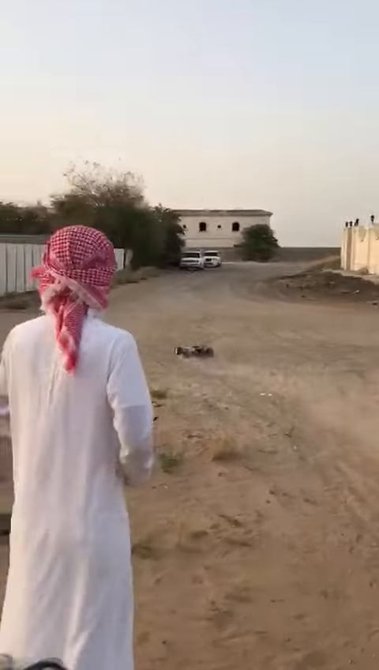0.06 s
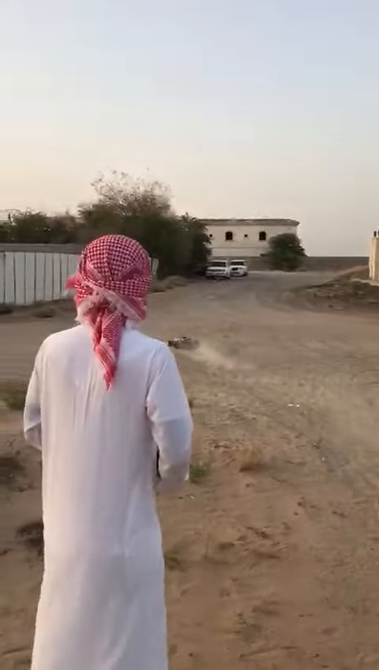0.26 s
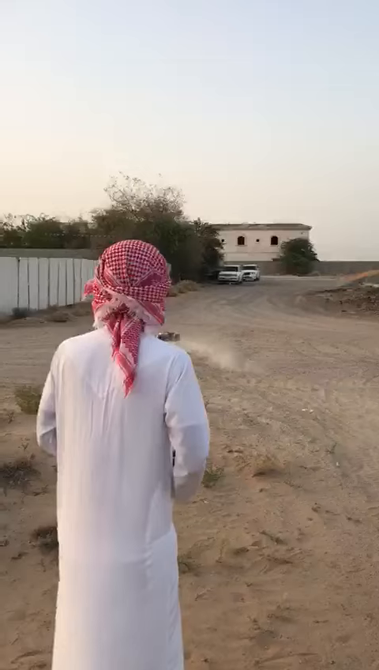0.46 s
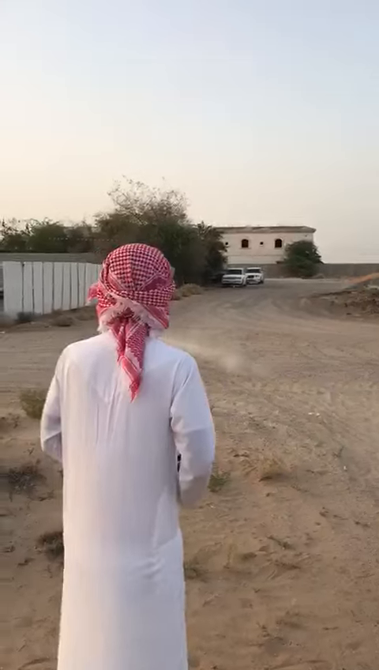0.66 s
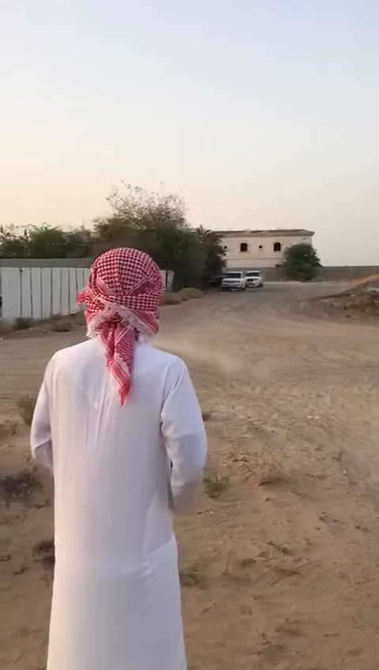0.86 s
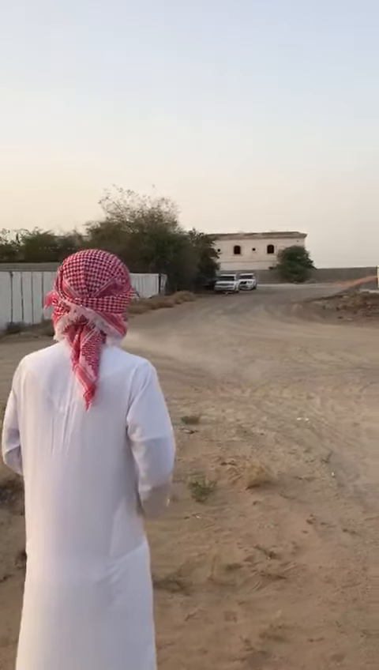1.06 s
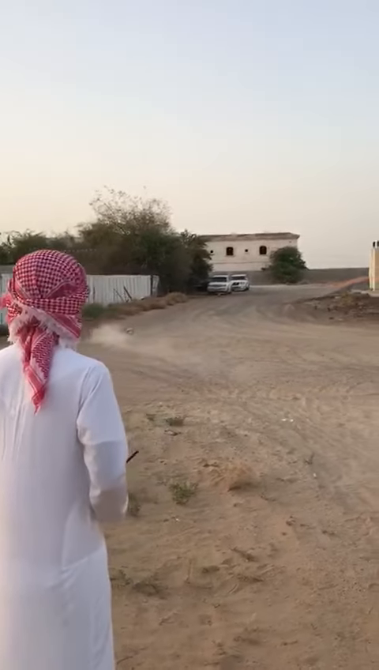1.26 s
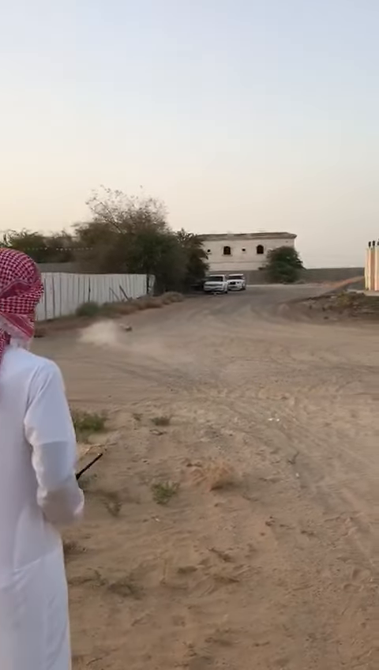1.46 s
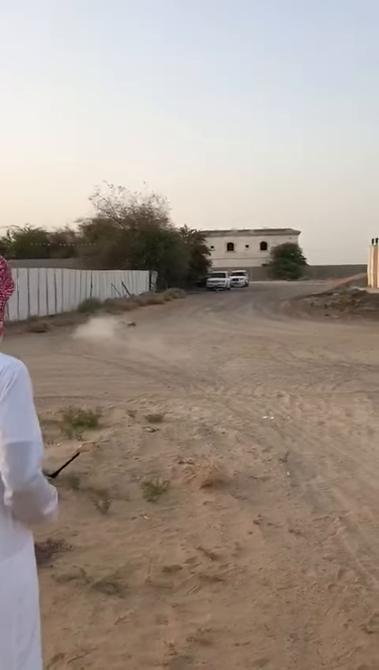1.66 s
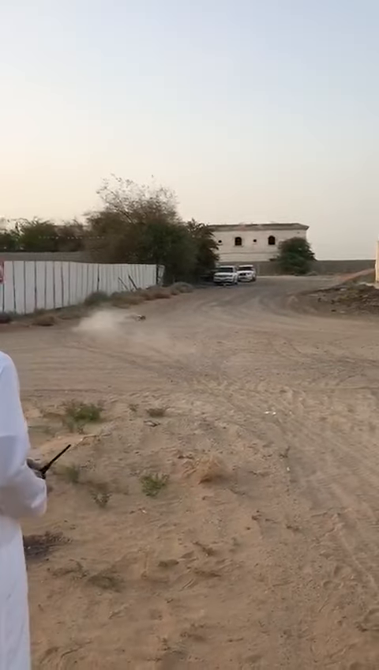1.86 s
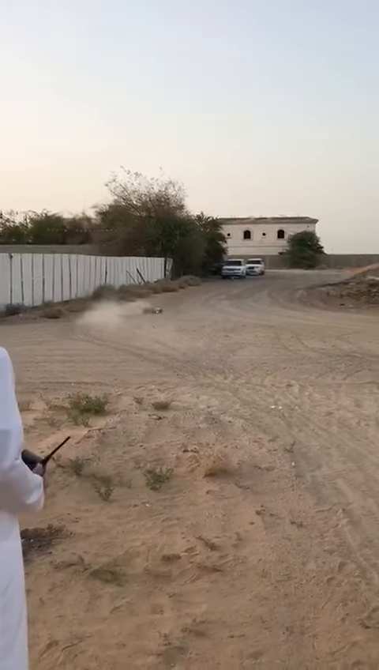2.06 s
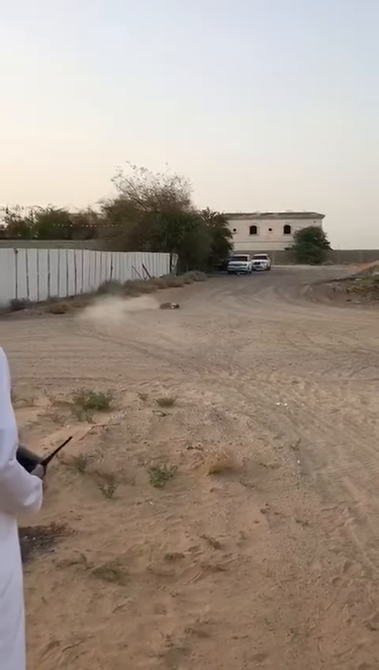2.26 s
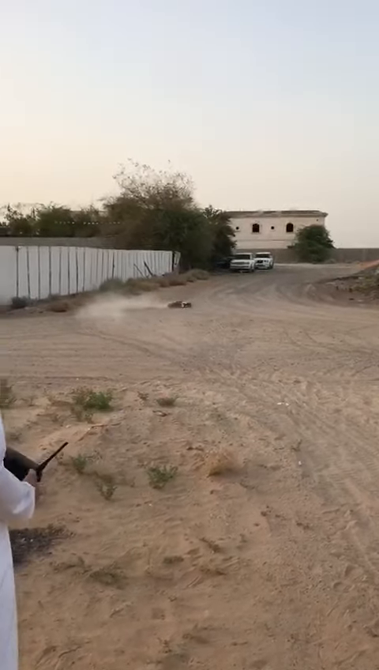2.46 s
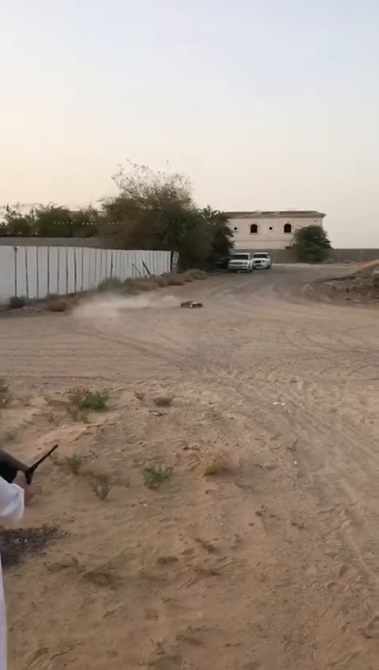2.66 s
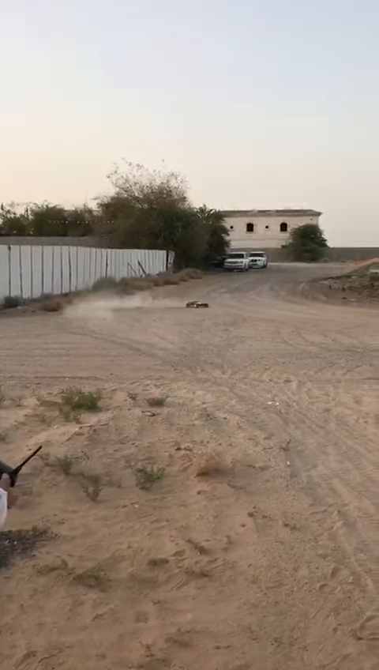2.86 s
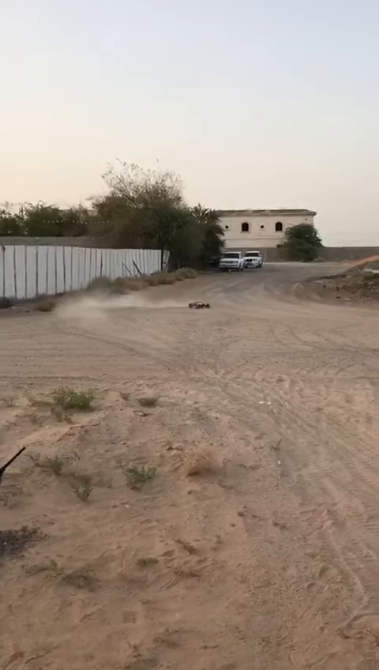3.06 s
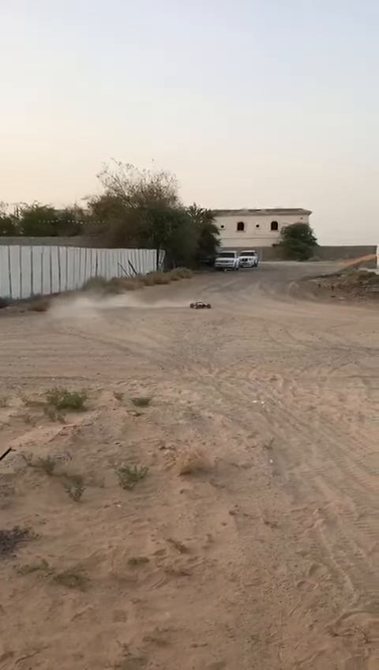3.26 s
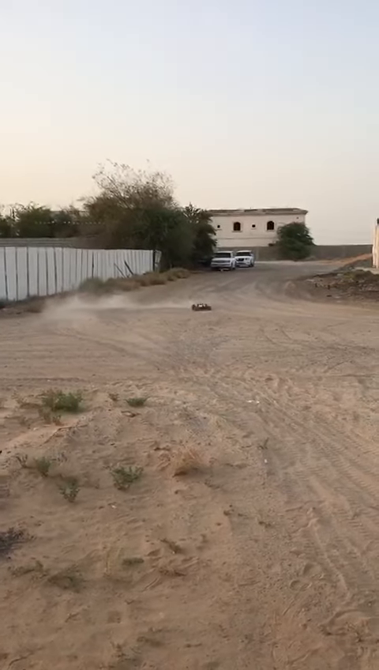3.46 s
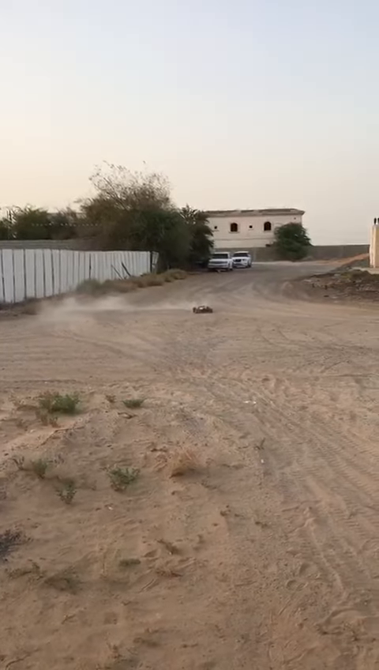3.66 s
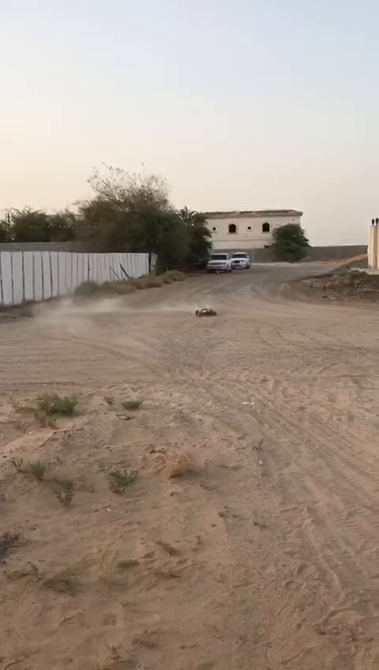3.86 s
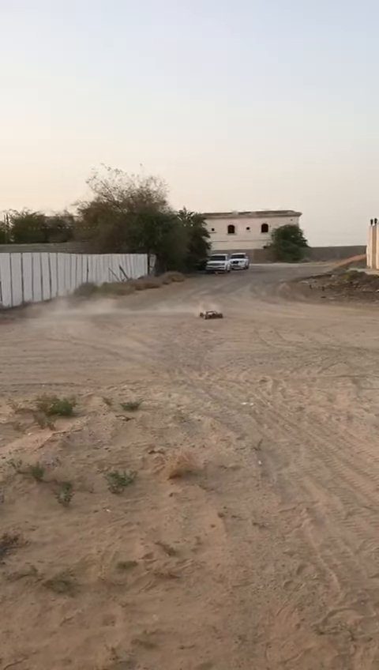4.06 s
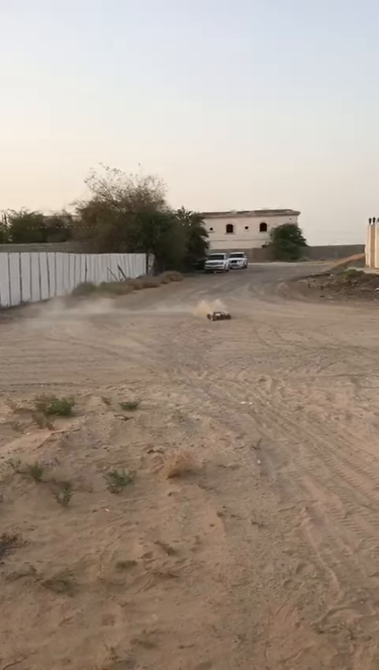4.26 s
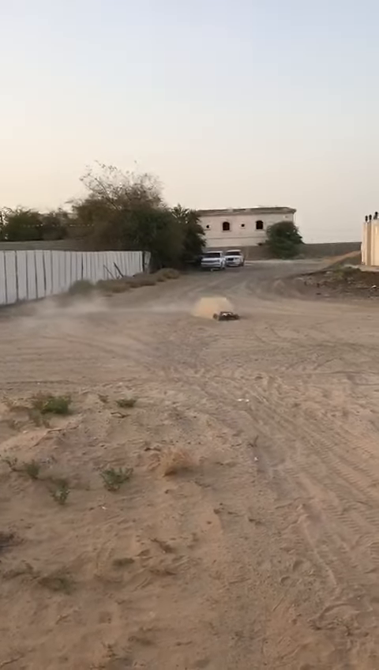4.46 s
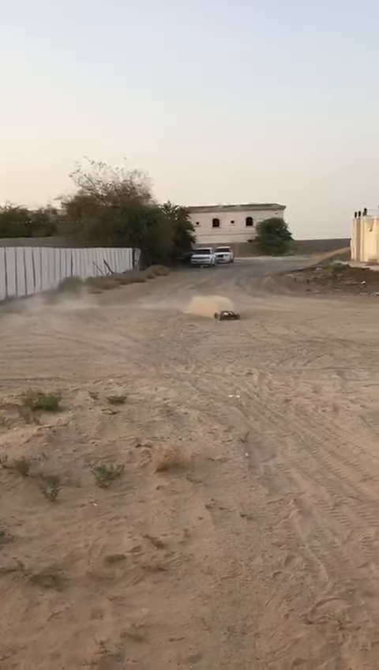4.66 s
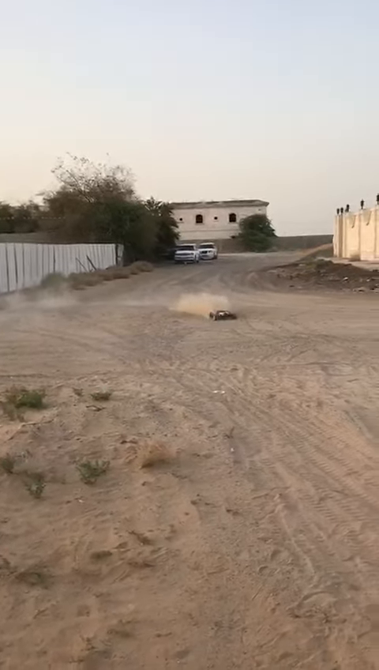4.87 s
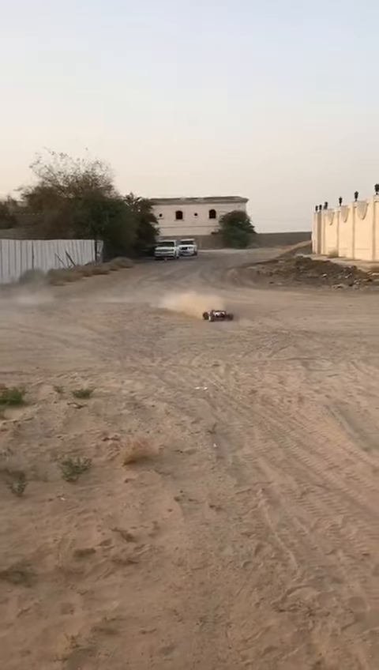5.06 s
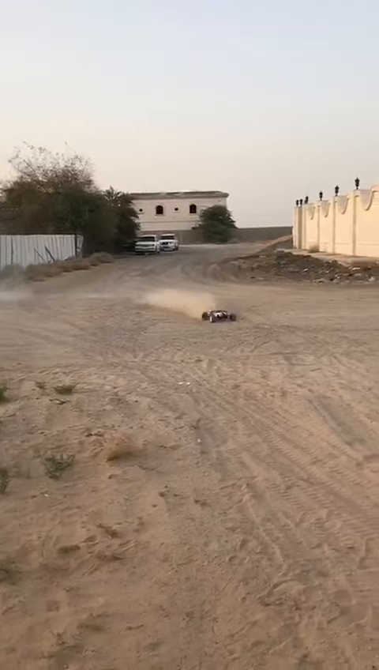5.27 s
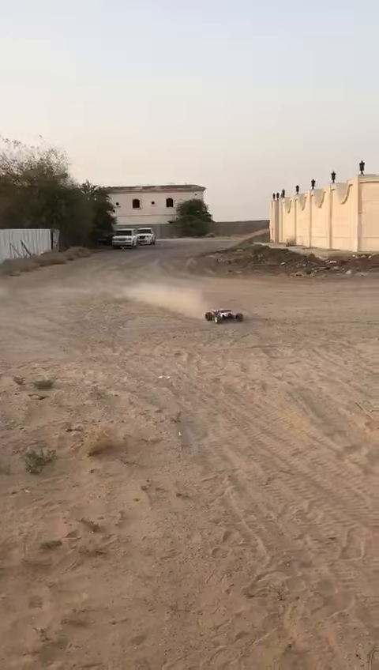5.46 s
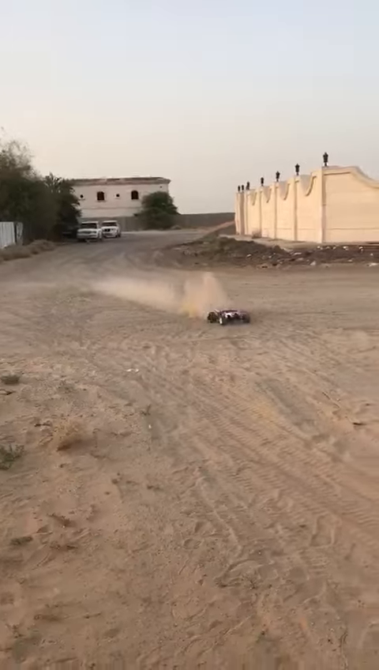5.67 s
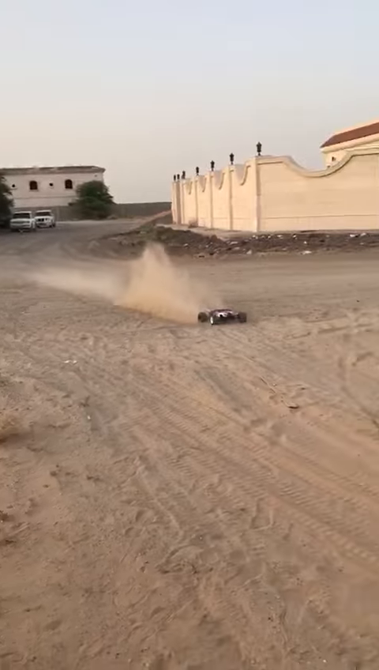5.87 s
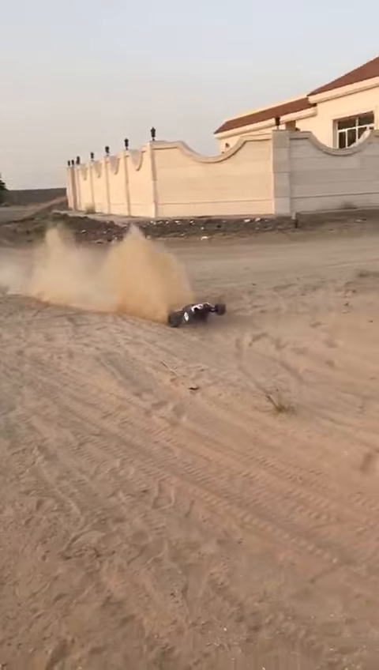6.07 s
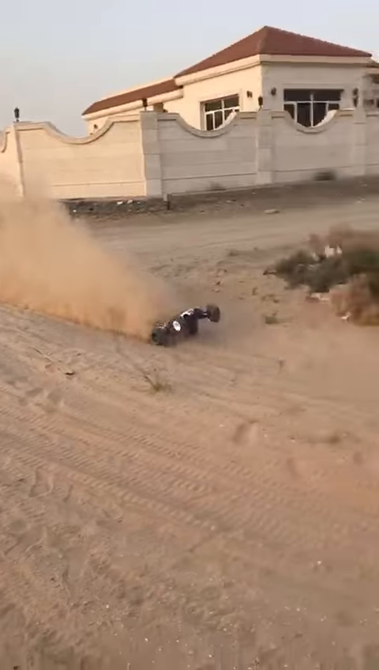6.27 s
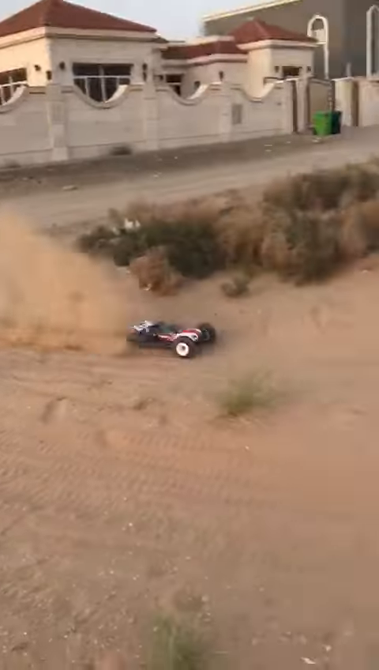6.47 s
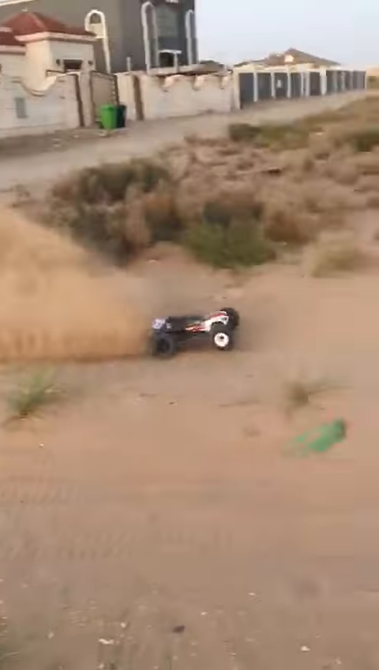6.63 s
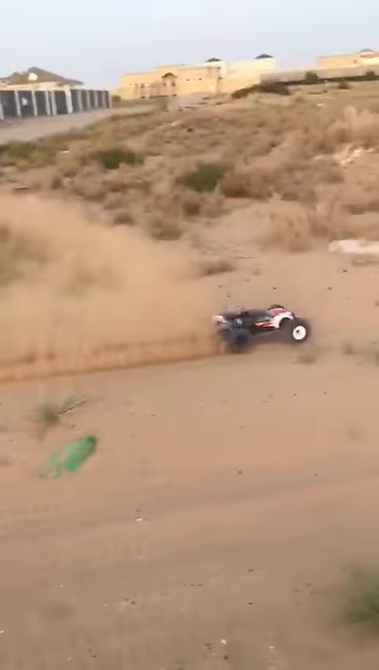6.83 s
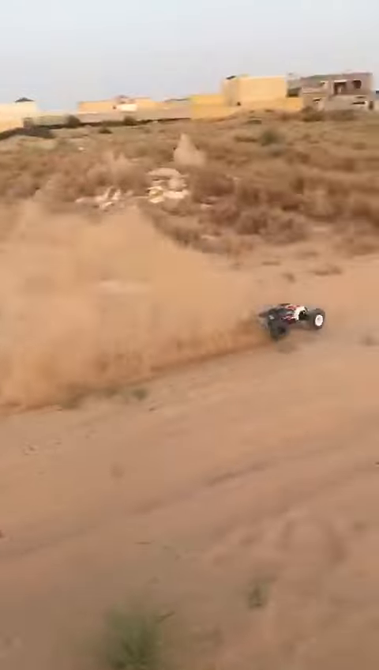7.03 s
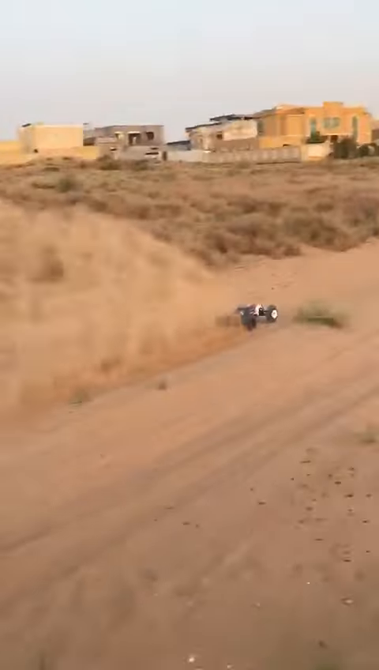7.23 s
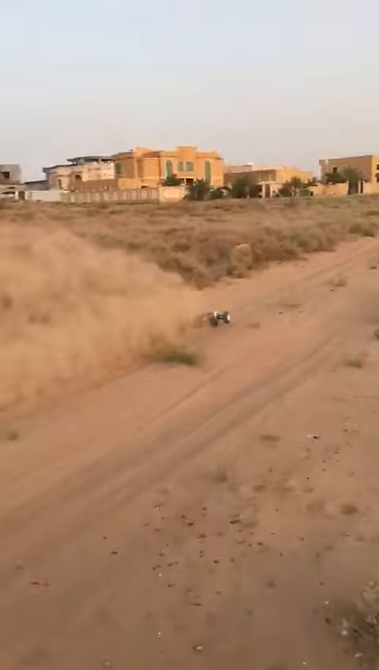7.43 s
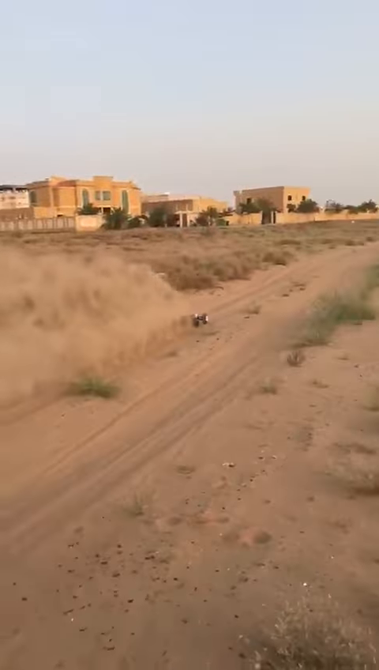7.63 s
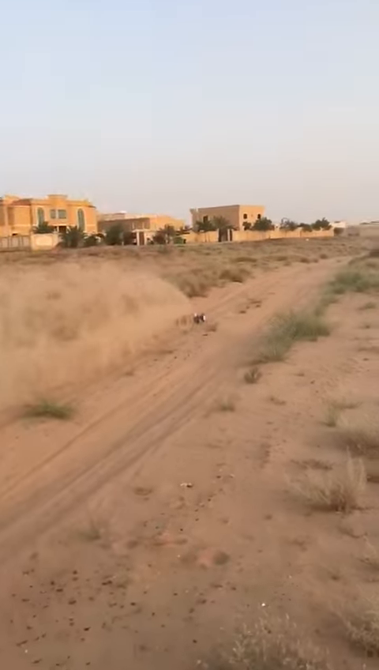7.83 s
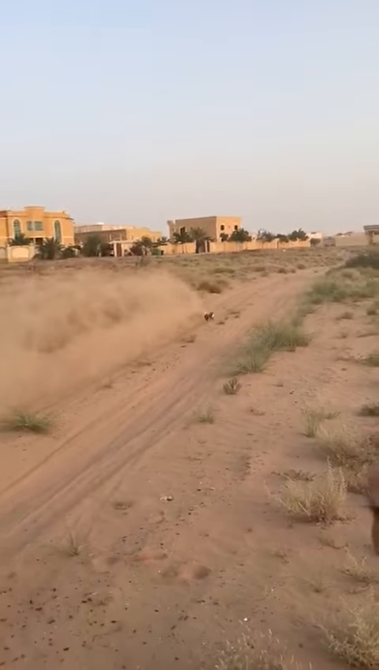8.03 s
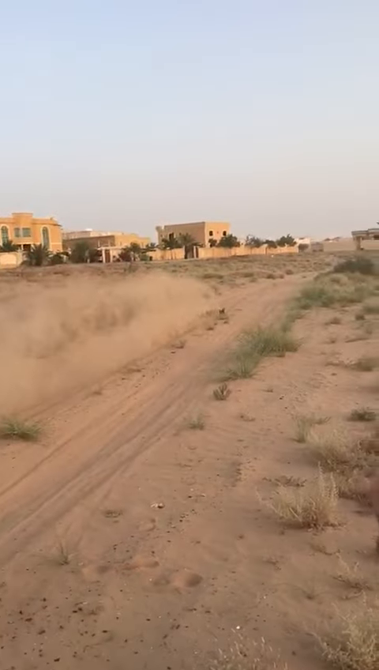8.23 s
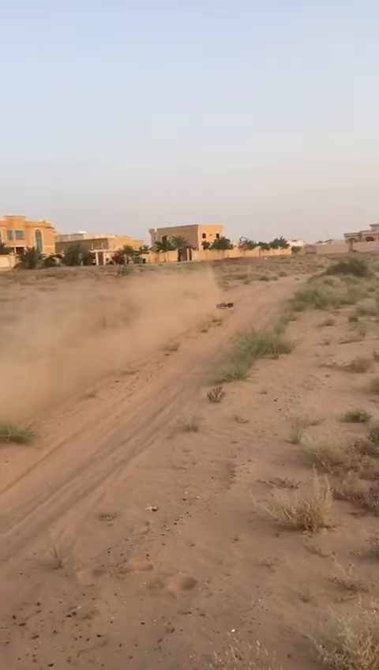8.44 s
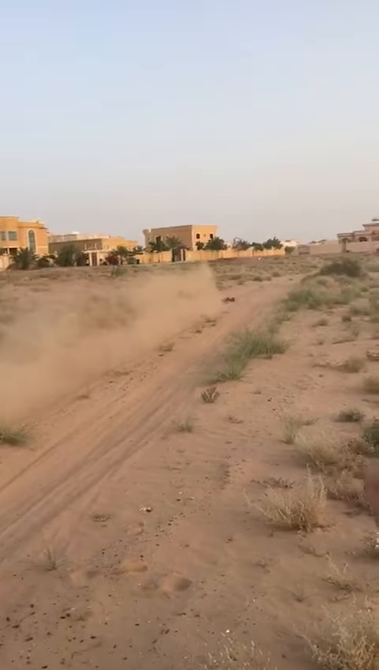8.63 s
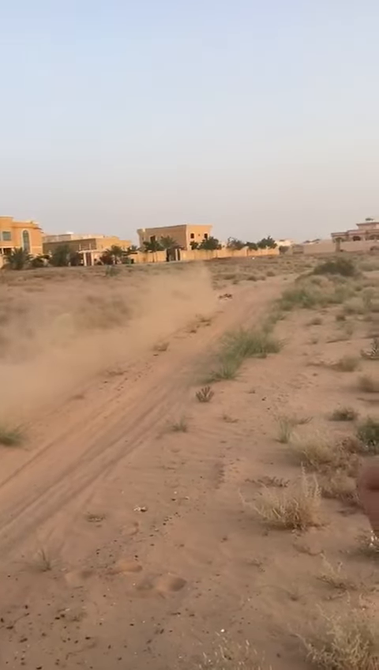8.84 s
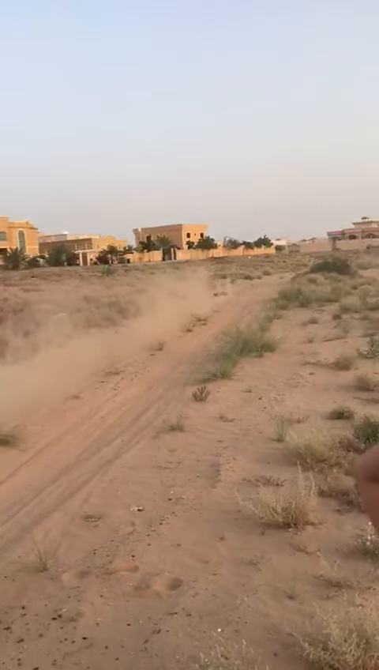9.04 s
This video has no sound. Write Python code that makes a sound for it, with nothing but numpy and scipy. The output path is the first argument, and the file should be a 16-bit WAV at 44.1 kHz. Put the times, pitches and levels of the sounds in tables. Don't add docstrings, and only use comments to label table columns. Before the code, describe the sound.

Open outdoor air with a soft hiss and low rumble, heard by a phone near a wall. From 0 s a distant electric model car clatters roughly on sandy dirt; at 0.2 s a very loud cluster of sharp stony cracks bursts out. Wind thumps around 0.5-0.75 s and 1.4 s. Between 0.76 and 1.3 s throttle bursts buzz while gears whine downward under braking. A tiny bird chirps near 1.7 s. From 1.9 to 2.9 s wheels slip, the whine sweeps upward, short rattling bursts stop and start, with knocks and another chirp. From 3 s a steady whir slowly rises and nears. At 5.6-6.1 s sand sprays, grit ticks and the pitch leaps to a scream. It passes loudest near 6.8 s, harsh, hissing, many whines layered. It recedes with a high whine until 8.45 s, then drops to faint rolling and a falling hum by 9.1 s.

```python
import sys
import numpy as np
from scipy import signal
from scipy.fft import rfft, irfft, next_fast_len
from scipy.io import wavfile
from scipy.ndimage import uniform_filter1d

SR = 44100
rng = np.random.default_rng(int(sys.argv[2]) if len(sys.argv) > 2 else 0)


def file_out(sig):
    cols = np.atleast_2d(sig).T
    lim = np.clip(cols, -1, 1)
    pcm = np.round(lim * 32767).astype(np.int16)
    wavfile.write(sys.argv[1], SR, pcm)


def boost(x):
    u = np.asarray(x, float) / 20
    return 10 ** u


N = 401303
SIZE = next_fast_len(N)
STEP = 32

PASSES_S, SPEED_M_S, CLOSEST_M, FAR_M = 6.847, 8.33, 3.15, 29.4

# on in [s], off in [s], level at on in [dB],
# level at off in [dB], motor effort [0-1].
THROTTLE = [(0.0, 0.4, -23.5, -31, 0.78), (0.763, 1.1, -26, -29.5, 0.67), (1.102, 1.3, -30, -47, 0.87),
            (1.854, 2.087, -35.5, -14.5, 0.5), (2.13, 2.276, -23.5, -30.5, 0.57), (2.31, 2.53, -30, -50, 0),
            (2.538, 2.726, -29.5, -24.5, 0.56), (2.748, 2.926, -32, -42.5, 0.45),
            (3.037, 4.1, -28.5, -31, 0.38), (4.103, 4.602, -26.5, -28.5, 0.43),
            (4.608, 5.511, -27, -26.5, 0.43), (5.52, 5.777, -24.5, -19, 0.5),
            (5.785, 5.934, -18.5, -21, 0.73), (5.938, 6.111, -24.5, -19.5, 0.59),
            (6.115, 6.76, -19, -23.5, 0.94), (6.764, 8.447, -22.5, -22, 0.82), (8.471, 9.1, -36, -40, 0.85)]
ATTACK_S, RELEASE_S = 0.0132, 0.0071
# time in [s], level in [dB].
ROLLING = [(0.0, -46), (0.25, -39.5), (0.75, -43), (1.3, -47), (1.86, -51), (2.15, -42), (2.29, -41.5),
           (2.36, -59), (2.65, -48), (2.74, -44.5), (2.84, -53.5), (3.05, -63), (4.0, -57.5), (5.5, -48),
           (6.8, -29), (7.6, -41), (8.5, -49.5), (9.1, -53.5)]
# time in [s], length in [s], level in [dB].
SPRAY = [
    (2.05, 0.031, -40.5),
    (2.658, 0.021, -45),
    (4.345, 0.19, -48.5),
    (5.7, 0.037, -32.5),
    (5.846, 0.05, -36),
    (6.138, 0.041, -34),
    (6.687, 0.03, -32),
]
# level at half effort in [dB], slope in [dB per unit
# effort], level under rolling in [dB], level under spray in [dB].
LAYERS = [
    (-11, 1, 0, -30),
    (0, -1, -2, -16),
    (-7.5, 12, -18.5, -8),
    (-12, 22.5, -16.5, -20),
    (-10, -2, -22, 0.5),
    (-13.5, 7.5, -24, -5),
]
# lowest in [Hz], highest in [Hz], share of the bumps [0-1].
LAYER_BANDS = [(150, 690, 0.52), (690, 3000, 0.23), (3000, 4750, 0.86),
               (4743, 7200, 0.81), (7200, 10000, 0.24), (10000, 13000, 0.34)]
# frequency in [Hz], level in [dB per Hz].
CHASSIS = [(82, -35), (140, 2.5), (250, 0.5), (393, -5), (540, 0), (801, -5.5), (931, -3.5), (1330, -7),
           (1940, -11.5), (2820, -10), (4760, 0.5), (5850, -7.5), (7470, -7), (11300, 1.5), (12400, -7),
           (16100, -59), (22000, -120)]
# frequency in [Hz], width in [Hz], level over the broad clatter in [dB],
# coming and going in [dB].
PANELS = [(216, 45, 2, 1.5), (560, 430, -4, 0.5), (950, 300, -4.5, -2.5), (1900, 710, -4.5, 1),
          (3220, 370, 2, 3), (3900, 980, -2, 4), (4660, 250, -4.5, -1), (5800, 270, -9, 3),
          (6420, 300, -16, -2), (8000, 520, -4, -2), (9430, 260, -5.5, 2.5)]
SWING_MAX_DB = 3

# frequency in [Hz], level in [dB per Hz].
AIR = [(18, -33), (30, -7.5), (76, -1.5), (171, -5), (413, -15), (1610, -10.5), (2290, -24), (9880, -25),
       (11500, -32), (12400, -50), (16100, -86), (22000, -120)]
AIR_DB = -55.5
CALM_DB, GUST_DB, GUST_S, GROUND_DB = -52, -15, 0.039, -12
# start in [s], peak in [dB], pitch in [Hz], 60 dB decay in [s].
THUMPS = [(0.056, -27.5, 54, 0.052), (0.538, -26.5, 64, 0.069), (0.667, -22, 70.0, 0.025),
          (0.736, -24, 86.1, 0.038), (1.404, -27, 64.6, 0.046), (1.425, -34, 60, .05),
          (2.392, -37, 72.7, 0.05), (2.414, -34, 78.1, 0.043), (2.539, -36, 56.5, 0.066),
          (2.744, -38, 53.8, 0.069), (2.767, -34, 48.4, 0.11), (2.803, -39, 75.4, 0.061),
          (2.867, -28.5, 56, 0.15)]
# start in [s], peak in [dB], ring in [Hz], 60 dB decay in [s], crack share [0-1].
KNOCKS = [(0.1555, -22, 1000, .02, .5), (0.163, -25, 3000, 0.034, .9), (0.507, -34, 9000, .025, .8),
          (0.5896, -31, 7000, .02, 0.9), (0.198, 3.5, 3370, 0.018, 0.9), (0.2015, -1, 2200, 0.02, 0.87),
          (0.2085, -8, 1820, 0.017, 0.75), (0.212, -11, 1960, 0.019, 0.85), (0.215, -1, 2000, 0.027, 0.88),
          (1.05, -31, 5450, 0.045, 0), (1.417, -34, 8000, .025, 0.8), (1.612, -33, 2800, 0.027, 0.3),
          (1.711, -39, 8800, 0.022, 0.75), (1.797, -24, 1000, 0.035, 0.35), (1.82, -27, 1500, .03, 0.4),
          (1.845, -32, 1500, .03, .5), (1.872, -38, 1000, 0.027, 0.6), (2.55, -34, 2300, .05, 0.3),
          (2.563, -17, 900, 0.027, 0.2), (2.675, -24, 380, 0.068, .1), (2.718, -23, 420, .04, 0.2),
          (2.768, -30, 6000, .03, 0.85), (2.538, -31, 4000, .02, .8), (2.92, -31, 2500, .025, 0.7),
          (2.527, -28, 6000, .02, 0.85), (2.166, -16, 460, 0.059, 0.1), (2.232, -17, 1310, 0.035, 0.53),
          (2.253, -13.5, 1200, 0.054, 0.2), (2.264, -19, 1310, 0.089, 0.24), (2.279, -19, 960, 0.064, 0.05),
          (2.695, -23, 328, 0.086, 0), (2.87, -37, 2740, 0.045, 0.22), (2.888, -30, 3500, 0.025, 0.5),
          (3.011, -27, 877, 0.035, 0.17), (3.045, -24, 950, 0.029, 0.1)]
# start in [s], peak in [dB].
GRIT = [(5.665, -17), (5.7962, -19), (5.8656, -17), (5.9778, -11), (6.0392, -16), (6.4048, -7),
        (6.5036, -12), (6.8184, -9), (6.8548, -13), (7.6819, -17), (8.2506, -23), (8.3165, -20)]
GRIT_HZ, GRIT_T60_S, GRIT_DB = 4500, .03, -2

# start in [s], length in [s], tooth rate in [Hz], slowing [per s].
BRAKING = (.76, .49, 3000, 1.75)
BRAKING_DB, BRAKING_FADE_DB_S, SQUEAL_FADE_DB_S = -52.5, -5, -10
SECOND_TONE_DB, THIRD_TONE_DB = 7, -3
# frequency in [Hz], width in [Hz], boost in [dB].
GEARBOX = [(880, 350, 15), (1360, 130, 10), (1780, 98, 7.5), (2270, 180, 6.5), (2550, 280, 4.5),
           (3080, 740, 8), (3700, 890, 2), (4900, 500, -8), (5720, 700, -7), (6750, 830, 2),
           (9000, 2600, 16.5)]
PATCHY_DB = 1.5
# start in [s], length in [s], from [Hz], to [Hz], level
# in [dB].
SURGES = [(5.68, .2, 1100, 1850, -34), (6.27, .17, 2200, 2480, -28.5), (6.44, .14, 2480, 2580, -29),
          (6.63, .22, 620, 820, -33), (6.6, .16, 900, 1220, -28), (6.79, .16, 2300, 2330, -30),
          (7.0, .15, 1900, 2044, -30.5), (6.1, 0.17, 1000, 1200, -36), (6.3, .32, 460, 520, -37),
          (6.2, .35, 110, 135, -44), (6.85, .2, 430, 500, -37), (0.9, .2, 950, 900, -51),
          (6.78, 0.133, 550, 630, -33), (6.86, .14, 960, 1300, -32.5), (6.42, 0.15, 970, 1300, -32),
          (6.72, 0.12, 5800, 5450, -30), (7.4, 0.0895, 5100, 5100, -32), (6.12, .1, 5000, 5600, -26),
          (6.35, 0.19, 5250, 5450, -31), (6.2, 0.092, 1000, 1150, -32), (8.34, 0.07, 520, 590, -43)]
SHAFT_DB = (0, -9)

# time in [s], pitch in [Hz], level in [dB].
CHIRP_A = [(1.62, 6150, -70), (1.66, 6440, -65), (1.74, 6230, -59), (1.775, 5600, -70)]
PEEP = [(1.73, 4010, -74), (1.78, 4010, -70), (1.88, 4010, -73)]
CHIRP_B = [(2.69, 6385, -64), (2.784, 6270, -57), (2.85, 5278, -78)]

# start in [s], length in [s], from [Hz], to [Hz],
# level in [dB].
SPINS = [
    (1.876, .2, 451.6, 3125, -46),
    (2.075, 0.032, 3180, 3250, -50),
    (2.57, .12, 715, 2380, -46.5),
    (1.99, .09, 500, 1400, -55),
    (5.62, .16, 2390, 5060, -36),
    (6.024, .105, 3610, 5550, -32.5),
]
SPIN_BEND, SPIN_SWELL_DB = 1.15, 5
FAR_SPIN_DB, NEAR_SPIN_DB = (1, -5, -10, -14, -16), (-4, -7.5, -10)

# time in [s], tooth rate in [Hz], level in [dB].
CRUISE = [(3.05, 780, -65), (3.2, 899.6, -52.5), (3.3, 965, -50.5), (3.5, 1055, -51), (3.7, 1105, -54.5),
          (4.09, 1140, -54)]
APPROACH = [(4.1, 1290, -50), (4.14, 1370, -46), (4.22, 1615, -47), (4.38, 1560, -53.5), (4.62, 1690, -47),
            (4.85, 1793, -43.5), (5.1, 2003, -48.5), (5.3, 2072, -48), (5.5, 2160, -51), (5.63, 2430, -47)]
LATE = [(4.72, 1743, -62), (4.9, 1837, -48), (5.1, 2010, -48), (5.3, 2069, -51), (5.5, 2170, -49),
        (5.63, 2440, -40)]
FULL = [(6.11, 5280, -24.5), (6.2, 5970, -23.5), (6.27, 6320, -25), (6.36, 6660, -38), (6.45, 6650, -50)]
AGAIN = [(6.66, 5410, -32), (6.72, 5750, -19), (6.77, 6060, -26), (6.83, 6340, -33), (6.9, 6510, -25.5),
         (7.02, 6560, -35)]
RECEDING = [(7.03, 5880, -29), (7.12, 6070, -28), (7.35, 6080, -34), (7.5, 5990, -27.5), (7.7, 5800, -30),
            (7.76, 5900, -42), (8.0, 5800, -47), (8.45, 5720, -46)]
CRUISE_DB, APPROACH_DB, LATE_DB = (0, -4, -7, -9, -18), (0, -4, -16, -20, -28), (-40, -40, 0, -4, -8)

# time in [s], rate in [Hz], level in [dB].
AXLE_FAR = [(4.15, 759.2, -56), (4.7, 844, -45), (5.1, 958, -43), (5.35, 885, -60), (5.6, 989, -42)]
AXLE = [(6.15, 820, -47), (6.33, 857, -32), (6.45, 899, -28), (6.55, 935, -30), (6.75, 1002, -34),
        (6.95, 1012, -47), (7.3, 938, -35), (7.55, 973, -35.5), (7.8, 996, -37), (8.45, 1010, -40)]
TREAD = [(5.62, 207.6, -43), (5.85, 204.6, -39.5), (6.2, 224.8, -42), (6.5, 232, -36.5),
         (6.8, 254.2, -30.5), (7.05, 262.3, -33), (7.3, 269.2, -38), (7.7, 288.3, -38), (8.3, 285.9, -39),
         (8.46, 280.3, -52), (8.8, 249, -49.5), (9.09, 225.3, -57)]
# time in [s], tooth rate in [Hz], level in [dB].
FRONT = [(5.8, 5344, -31), (5.92, 5300, -33.5), (5.97, 5260, -58), (6.18, 4970, -24), (6.45, 5410, -38),
         (6.7, 5295, -28), (7.05, 5110, -31.5), (7.3, 5184, -29), (7.45, 5310, -28.5), (7.6, 5185, -37),
         (8.45, 5130, -37.5)]
REAR = [(6.14, 3970, -34), (6.22, 4250, -27), (6.4, 4050, -39), (6.78, 4250, -32), (6.86, 4410, -23),
        (7.0, 4357, -39), (7.2, 4560, -31), (7.45, 4407, -42), (7.95, 4300, -36), (8.46, 4256, -39.5)]
SPUR = [(7.15, 1947, -37), (7.7, 1900, -37.5), (8.45, 1835, -43.5)]
CENTRE = [(7.2, 3750, -42), (7.7, 3692, -36), (8.45, 3630, -44.5)]

# frequency in [Hz], width in [Hz], share at the farthest [0-1].
GROUND_DIPS = [(380, 170, 0.15), (780, 110, 0.16), (1310, 170, 0.03)]
# frequency in [Hz], width in [Hz], gain in [dB].
PHONE = [(381, 130, -1.5), (764, 110, -5), (1176, 270, -3), (2450, 1030, -2), (4844, 450, -6),
         (7460, 1050, -4.5), (10400, 360, 1.5), (10440, 1100, -5)]
TOP_HZ = 12000


def noise():
    return rng.standard_normal(N)


def unit(x):
    return x / np.sqrt(np.mean(x ** 2))


def columns(rows, first=0, last=N):
    s, *values = np.transpose(rows)
    return [np.interp(np.arange(first, last) / SR, s, v) for v in values]


def walk(rate, size=N):
    count = int(2 * rate * size / SR) + 3
    knots = uniform_filter1d(rng.standard_normal(count), size=2) * np.sqrt(2)
    return 1.1 * np.interp(np.linspace(0, len(knots) - 1, size), np.arange(len(knots)), knots)


def shape(points):
    f = np.arange(SIZE // 2 + 1) * SR / SIZE + 1
    hz, db = np.transpose(points)
    return f, boost(np.interp(np.log(f), np.log(hz), db))


def colour(points, lo_hz, hi_hz):
    f, gain = shape(points)
    gain = gain / np.sqrt((1 + (lo_hz / f) ** 12) * (1 + (f / hi_hz) ** 12))
    return unit(irfft(rfft(noise(), SIZE) * gain, SIZE)[:N])


def ticks():
    return np.arange(0, N + STEP, STEP) / SR


def full_rate(v):
    return np.interp(np.arange(N) / SR, ticks(), v)


def nearness_db(t):
    r = np.hypot(SPEED_M_S * (t - PASSES_S), CLOSEST_M)
    return -20 * np.log10(np.minimum(r, FAR_M) / CLOSEST_M)


def grains(rate, spread_db, hiss):
    struck = rng.random(N) < rate / SR
    size_db = spread_db * np.minimum(rng.exponential(size=N), 3)
    return unit(struck * boost(size_db) * noise()) + hiss * noise()


def layer_gains():
    t = ticks()
    rolling = np.interp(t, *np.transpose(ROLLING))
    spray = sum(boost(db) ** 2 * np.exp(-((t - s) / length) ** 2) for s, length, db in SPRAY)
    bursts = []
    for on, off, on_db, off_db, effort in THROTTLE:
        level = boost(np.interp(t, (on, off), (on_db, off_db)) + nearness_db(t))
        attack = np.clip((t - on) / ATTACK_S + .5, 0, 1)
        release = np.exp(-np.maximum(t - off, 0) / RELEASE_S)
        bursts.append((level * attack * release, effort))
    gains = []
    for db, slope_db, roll_db, spray_db in LAYERS:
        driven = sum((gain * boost(db + slope_db * (effort - .5))) ** 2 for gain, effort in bursts)
        power = driven + boost(rolling + roll_db) ** 2 + spray * boost(spray_db) ** 2
        gains.append(full_rate(np.sqrt(power)))
    return gains


def chassis():
    gains = layer_gains()
    f, gain = shape(CHASSIS)
    clatter = rfft(grains(6000, 2.3, 1.14), SIZE) * gain
    bumps = 0.24 * walk(12) + 1.2 * walk(35) + 1.66 * walk(64)
    centres = 170 * 2 ** np.arange(0, 6.3, .4)
    windows = [(hz, np.exp(-(np.log2(f / hz) / .3) ** 2), 1.2) for hz in centres]
    windows += [(hz, boost(db) / (1 + (2 * (f - hz) / width) ** 2), swing) for hz, width, db, swing in PANELS]
    out = 0
    for level, (lo_hz, hi_hz, shaken) in zip(gains, LAYER_BANDS):
        layer = 0
        for hz, window, swing in windows:
            if lo_hz <= hz < hi_hz:
                swell_db = np.clip(swing, 0, SWING_MAX_DB) * walk(2.5) + 1.65 * walk(25)
                layer = layer + boost(swell_db) * irfft(clatter * window, SIZE)[:N]
        out = out + level * boost(shaken * bumps) * unit(layer)
    return out


def rumble_gain():
    t = ticks()
    gusts = sum(boost(db + GUST_DB) ** 2 * np.exp(-np.abs(t - s - .02) / GUST_S) for s, db, hz, t60 in THUMPS)
    ground = boost(np.interp(t, *np.transpose(ROLLING)) + GROUND_DB) ** 2
    return full_rate(np.sqrt(boost(CALM_DB) ** 2 + gusts + ground))


def open_air():
    rumble = rumble_gain() * boost(3.24 * walk(10)) * colour(AIR, 41.4, 131.5)
    air = boost(AIR_DB + 2.3 * walk(2.73)) * colour(AIR, 145, 13000)
    return rumble + air


def thumps():
    out, t = np.zeros(N + 8192), np.arange(8192) / SR
    for s, db, hz, t60 in THUMPS:
        push = np.sin(2 * np.pi * hz * t) * (1 - np.exp(-t / 0.0085)) * 1000 ** (-t / t60)
        start = int(s * SR)
        out[start:start + len(t)] += boost(db) * push / np.max(np.abs(push))
    return out[:N]


def strikes(rows):
    out, t = np.zeros(N + 4096), np.arange(4096) / SR
    for s, db, hz, t60, share in rows:
        puff = rng.standard_normal(len(t))
        crack = signal.lfilter([1, -.6], [1], puff) / 3
        ring = signal.lfilter(*signal.iirpeak(hz, 5.0, fs=SR), puff) * 3
        envelope = (1 - np.exp(-t / 0.00035)) * 1000 ** (-t / t60)
        start = int(s * SR)
        out[start:start + len(t)] += boost(db) * (share * crack + (1 - share) * ring) * envelope
    return out[:N]


def knocks():
    return strikes(KNOCKS)


def whine(rows, blur, steady, harmonics_db=(0,), rings=()):
    a, b = int(rows[0][0] * SR), int(rows[-1][0] * SR)
    size = b - a
    hz, level_db = columns(rows, first=a, last=b)
    phase = 2 * np.pi * np.cumsum(hz * (1 + blur / 5 * walk(25, size))) / SR
    i = np.arange(size)
    gate = np.clip(np.minimum(i, i[::-1]) / (0.0065 * SR), 0, 1)
    out = np.zeros(N)
    for k, db in enumerate(harmonics_db, 1):
        ringing_db = sum(d / (1 + (2 * (k * hz - f) / width) ** 2) for f, width, d in rings)
        db = db + level_db + PATCHY_DB * walk(20, size) + ringing_db
        rate = blur * np.mean(hz) * k
        smear = steady + walk(rate, size) + 1j * walk(rate, size)
        tone = np.real(smear * np.exp(1j * k * phase)) / np.sqrt(1 + steady ** 2 / 2)
        out[a:b] += gate * (k * hz < .45 * SR) * boost(db) * tone
    return out


def mesh(rows, blur, steady, harmonics_db):
    return whine(rows, blur, steady, harmonics_db, GEARBOX)


def glide(s, length, from_hz, to_hz, db, bend, swell_db):
    u = np.linspace(0, 1, num=12)
    hz = from_hz + (to_hz - from_hz) * u ** bend
    return np.transpose([s + length * u, hz, db - swell_db * np.exp(-6 * u)])


def braking_gears():
    s, length, hz, slowing = BRAKING
    rows = [(s + t, hz * np.exp(-slowing * t), BRAKING_DB + BRAKING_FADE_DB_S * t)
            for t in np.linspace(0, length, num=8)]
    squeal = [(u, rate, db + SQUEAL_FADE_DB_S * (u - s)) for u, rate, db in rows[:5]]
    first = mesh(rows, .08, .3, (0,))
    second = whine(squeal, .06, .2, (-40, SECOND_TONE_DB))
    third = whine(rows[3:6], .04, .2, (-40, -40, THIRD_TONE_DB))
    return first + second + third


def surging_shafts():
    return sum(whine(glide(*row, 1, 2), .04, .6, SHAFT_DB) for row in SURGES)


def bird():
    return sum(whine(call, 0.0055, 2.5) for call in (CHIRP_A, PEEP, CHIRP_B))


def wheel_spins():
    out = 0
    for row in SPINS:
        near = row[0] > 4
        rows = glide(*row, SPIN_BEND, SPIN_SWELL_DB)
        out = out + mesh(rows, .08 if near else .12, .5, NEAR_SPIN_DB if near else FAR_SPIN_DB)
    return out


def driving_gears():
    coming = mesh(CRUISE, .14, .35, CRUISE_DB) + mesh(APPROACH, .07, .5, APPROACH_DB)
    upper = whine(LATE, .08, .15, LATE_DB)
    full = whine(FULL, .04, .25) + whine(AGAIN, .04, .25)
    growl = whine(glide(6.55, .5, 95, 120, -42, 1, 2), .1, .5)
    return coming + upper + full + growl + whine(RECEDING, .035, .3)


def shafts():
    axles = whine(AXLE_FAR, .07, .6) + whine(AXLE, .03, 1.5, SHAFT_DB)
    return axles + whine(TREAD, .07, 1.6, SHAFT_DB)


def flung_grit():
    return strikes([(s, db + GRIT_DB, GRIT_HZ, GRIT_T60_S, .6) for s, db in GRIT])


def differentials():
    ends = whine(FRONT, .05, .1) + whine(REAR, .07, .1)
    return ends + whine(SPUR, .07, .3) + whine(CENTRE, .06, .15)


def over_ground(car):
    far = full_rate(nearness_db(ticks()) / nearness_db(0))
    cut = sum(share * signal.lfilter(*signal.iirpeak(hz, hz / width, fs=SR), car)
              for hz, width, share in GROUND_DIPS)
    return car - far * cut


def scene():
    gears = braking_gears() + surging_shafts() + wheel_spins() + driving_gears() + shafts() + differentials()
    car = over_ground(chassis() + gears)
    wall = np.roll(uniform_filter1d(car, size=3), int(.045 * SR))
    around = open_air() + thumps() + knocks() + bird() + flung_grit()
    return (car + boost(-13.0) * wall + around)[None]


def band_limit(x):
    return signal.sosfilt(signal.butter(12, 12300, fs=SR, output="sos"), x)


def record(dry):
    f = np.arange(SIZE // 2 + 1) * SR / SIZE
    db = sum(d / (1 + (2 * (f - hz) / width) ** 2) for hz, width, d in PHONE)
    response = boost(db) / (1 + (f / TOP_HZ) ** 70)
    heard = irfft(rfft(dry, SIZE) * response, SIZE)[:, :N]
    heard = np.tanh(1.027 * heard) / 1.178
    return band_limit(heard)


dry = scene()
out = record(dry)
file_out(out)
```